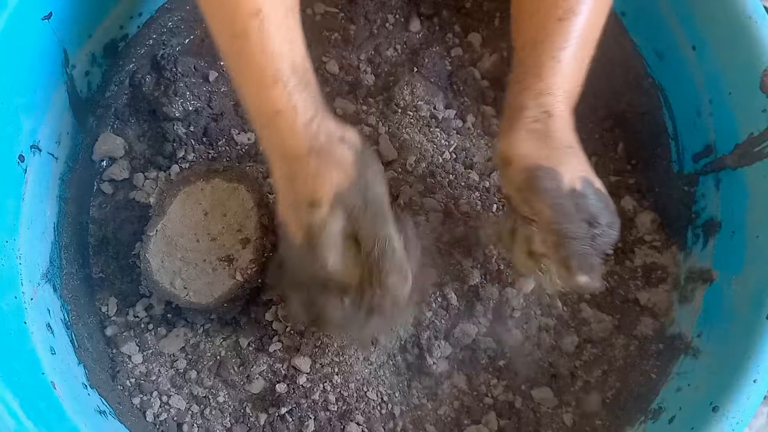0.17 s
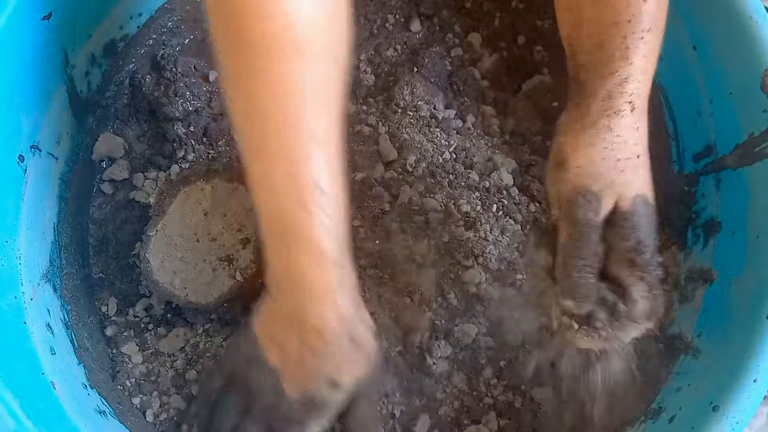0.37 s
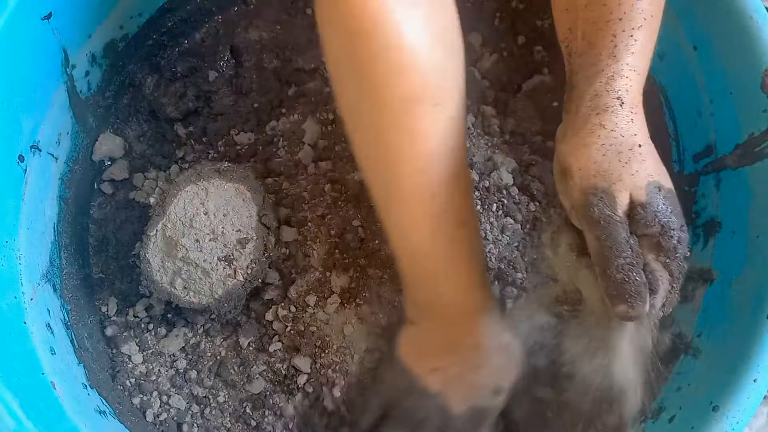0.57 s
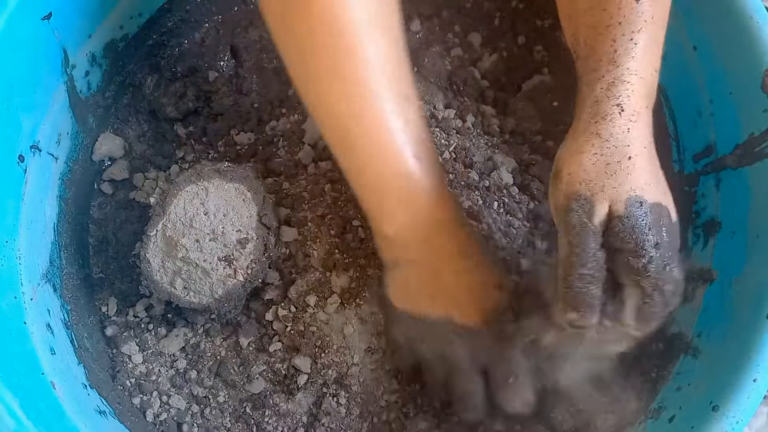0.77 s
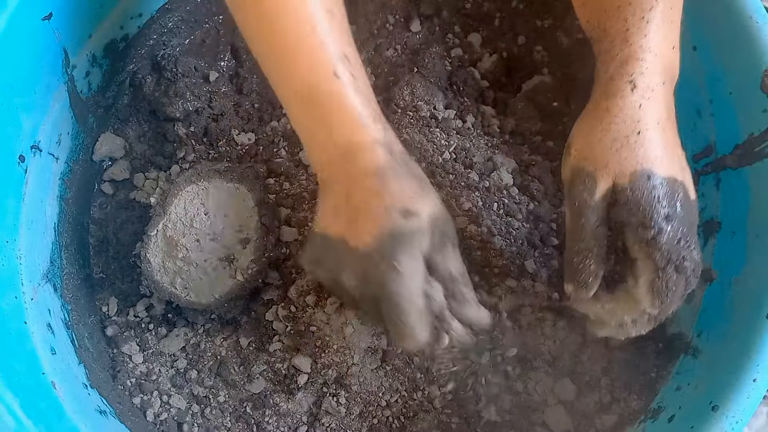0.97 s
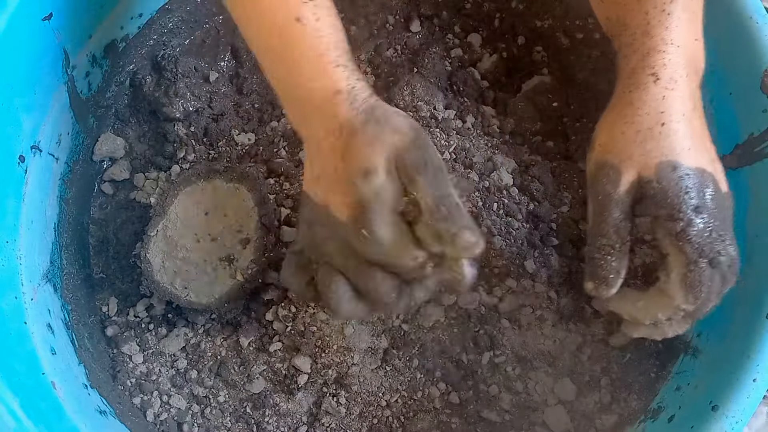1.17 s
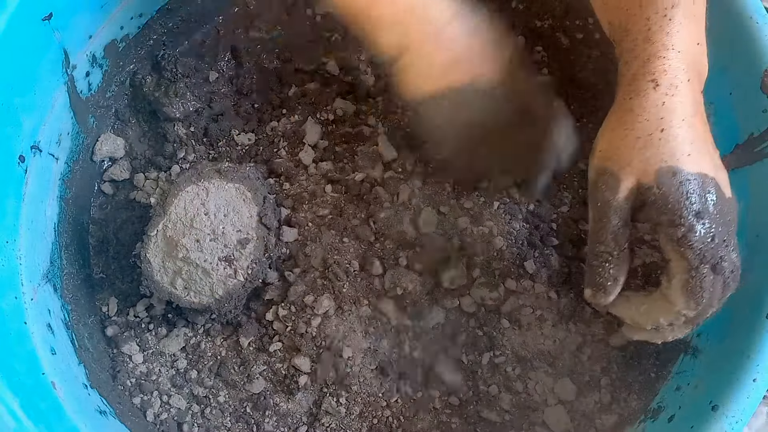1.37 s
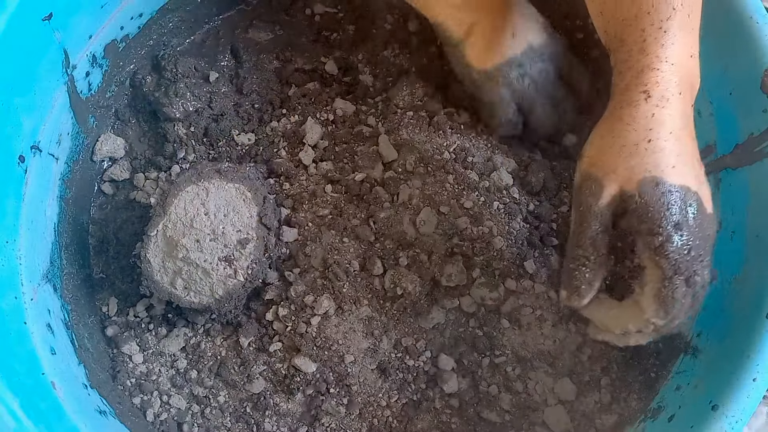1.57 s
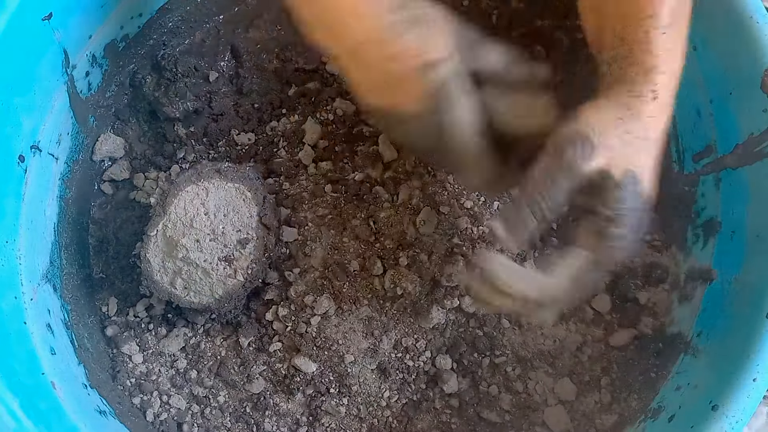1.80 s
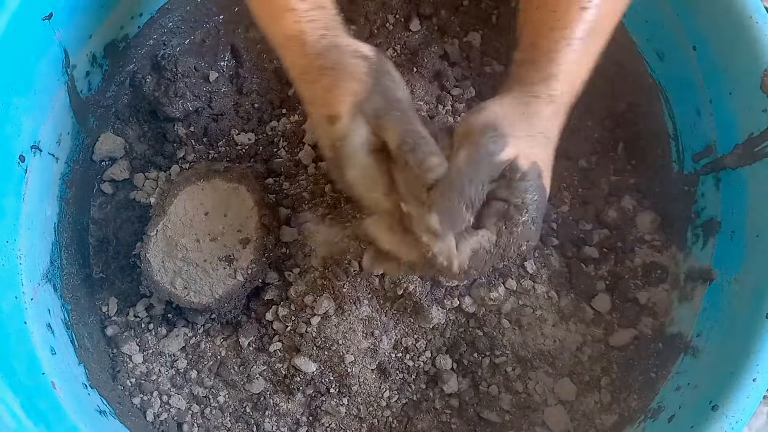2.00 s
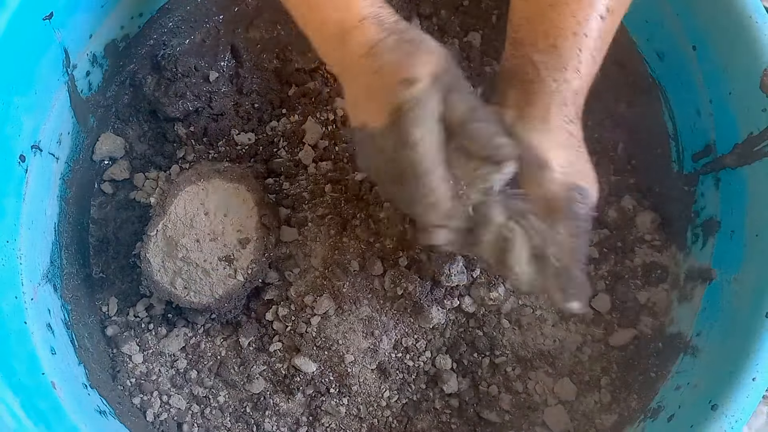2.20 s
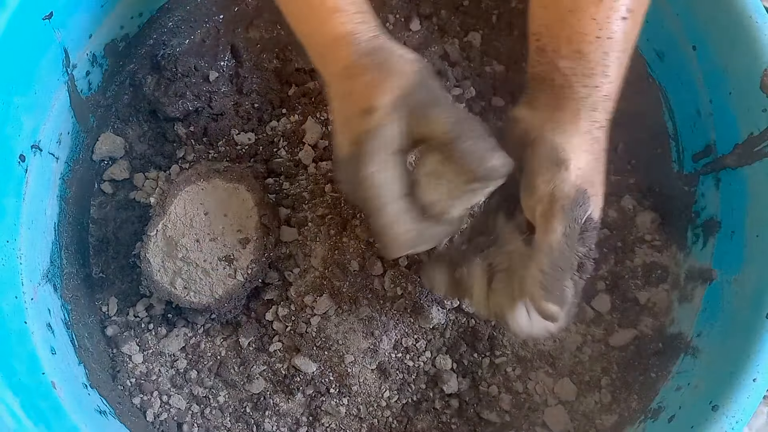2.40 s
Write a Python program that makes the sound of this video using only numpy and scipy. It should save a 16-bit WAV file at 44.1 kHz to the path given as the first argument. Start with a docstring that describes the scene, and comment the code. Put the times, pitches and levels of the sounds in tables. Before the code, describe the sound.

Gritty lumps of damp charcoal are dug, crushed and rubbed by hand in a plastic tub, very close

```python
"""In a plastic basin in a room, close to the microphone, two hands crumble damp, gritty charcoal.
Grit trickles and is rubbed as dense random clicks; a digging hand scrapes by stick-slip, shaking basin and heap.
Knocks are damped thuds with basin modes, snaps single band-passed cracks, crunches dying runs of cracks.
A hard bit pings in decaying sines, and a fresh handful bursts near the end.
Filtered noise gives a low rush and room air behind, with a faint hum."""
import sys
import numpy as np
from scipy import signal
from scipy.fft import rfft, irfft, next_fast_len
from scipy.io import wavfile

SR = 44100
rng = np.random.default_rng(int(sys.argv[2]) if len(sys.argv) > 2 else 0)


def transcribe(u):
    """Save the signal u as a 16-bit wav file named by the first command-line argument.

    u: samples, shape (n,) or (channels, n), limited to [-1, 1]; the rate is SR.
    q: integer samples, one column per channel.
    """
    v = np.clip(np.atleast_2d(u).T, -1, 1)
    q = np.round(v * 32767).astype(np.int16)
    wavfile.write(sys.argv[1], SR, q)


N = 108045
T = np.arange(N) / SR   # time in seconds
CRACKS_PER_S, SLIP_SPREAD_DB = 7600, 2.5


def from_db(db):
    """Amplitude gain is ten to the power of the level in decibels over 20."""
    return 10 ** (np.asarray(db) / 20)


def rms_one(x):
    """Normalise to unit mean-square power."""
    return x / np.sqrt(np.mean(x ** 2) + 1e-20)


def peak_one(x):
    """Normalise to unit peak amplitude."""
    return x / (np.abs(x).max() + 1e-20)


def level(rows):
    """Amplitude envelope: gain over time, linear in decibels between (seconds, dB) points."""
    return from_db(np.interp(T, *np.transpose(rows)))


def add(out, s, sound):
    """Superposition: sum a sound into the output from time s in seconds."""
    i = max(int(s * SR), 0)
    out[i:i + len(sound)] += sound[:max(N - i, 0)]


def colour(x, points):
    """Minimum-phase filtering through (Hz, dB) points by a folded cepstrum; unit power."""
    point_hz, point_db = np.transpose(points)
    size = 2 * next_fast_len(N)
    bin_hz = np.fft.rfftfreq(size, 1 / SR)
    gain = from_db(np.interp(np.log(bin_hz + 1), np.log(point_hz), point_db))
    cepstrum = irfft(np.log(gain))[:size // 2]
    cepstrum[1:] *= 2   # folding makes the response causal
    response = np.exp(rfft(cepstrum, size))
    return rms_one(irfft(rfft(x, size) * response)[:N])


def ring(x, hz, t60):
    """Damped resonator: a unit click starts a sine of height 1 that falls 60 dB in t60 seconds."""
    r, w = from_db(-60 / (t60 * SR)), 2 * np.pi * hz / SR
    # the tiny offset keeps the filter state from dying to denormal numbers
    return signal.lfilter([0, np.sin(w)], [1, -2 * r * np.cos(w), r * r], x + 1e-18)


def band(x, hz, width):
    """Broad resonance: its width is a share of its centre, limited to a third of the sample rate."""
    share = min(width, SR / 3 / hz)
    return signal.lfilter(*signal.iirpeak(hz, 1 / share, fs=SR), x)


def grains(per_s, spread_db, size=N):
    """Random impulse train: sparse clicks of either sign, many small and a few large; unit power."""
    sizes = from_db(spread_db * np.minimum(rng.exponential(1, size), 5))
    signs = rng.choice([-1, 1], size)
    return rms_one(sizes * signs * (rng.random(size) < per_s / SR))


def background():
    """Filtered noise and a steady tone: a low rush that comes and goes, room air and a faint hum."""
    # Low rush. Each row: time in seconds, level in dB.
    rush_level = [(0, -34.5), (.3, -39.5), (.8, -43), (1.0, -45.5), (1.17, -42.5), (1.3, -44), (1.45, -68),
                  (1.49, -37), (1.6, -31.5), (1.68, -42), (2.2, -39.5), (2.3, -44), (2.35, -57),
                  (2.45, -64)]
    # Spectrum of the rush. Each row: frequency in Hz, relative level in dB.
    rush_colour = [(60, -22), (170, -8.5), (240, -16.5), (370, 2.5), (480, 1.5), (600, 1.5), (750, -16),
                   (1100, -39), (4000, -62)]
    # Spectrum of the room air. Each row: frequency in Hz, relative level in dB.
    air_colour = [(20, -57), (45, -26), (80, 3), (140, -6), (250, -9), (500, -11), (1000, -27.5),
                  (3000, -26.5), (8000, -27), (16000, -31)]
    air_db, hum_hz, hum_db = -44.5, 103.3, -54.5
    rush = level(rush_level) * colour(rng.standard_normal(N), rush_colour)
    air = from_db(air_db) * colour(rng.standard_normal(N), air_colour)
    hum = from_db(hum_db) * rms_one(np.sin(2 * np.pi * hum_hz * T))
    return rush + air + hum


def room(x):
    """Diffuse reverberation: convolution with exponentially decaying noise of unit energy."""
    room_db, room_t60_s = -19, 0.21
    t = T[:SR // 2]
    tail = rng.standard_normal(len(t)) * from_db(-60 * t / room_t60_s)
    return from_db(room_db) * signal.fftconvolve(x, tail / np.linalg.norm(tail))[:N]


def grit():
    """Granular noise: fine grains rub and fall, and larger crumbs excite six tick resonances."""
    # Grit rubbed and spilled by the fingers. Each row: time in seconds, level of the fine grains in dB.
    grit_flow = [(0, -30), (.03, -31), (.115, -31.5), (.15, -39.5), (.19, -34.5), (.235, -46.5), (.29, -46),
                 (.36, -41), (.72, -35), (.77, -42), (.83, -34), (.89, -31.5), (.97, -38), (1.04, -40.5),
                 (1.085, -37.5), (1.15, -34), (1.195, -50), (1.24, -57), (1.26, -39.5), (1.33, -61.5),
                 (1.455, -65), (1.475, -41.5), (1.5, -40.5), (1.58, -32.5), (1.65, -45.5), (1.72, -52.5),
                 (1.86, -59.5), (2.0, -72), (2.16, -62), (2.22, -47), (2.25, -45), (2.32, -53),
                 (2.365, -44), (2.41, -59), (2.45, -55)]
    # Spectrum of the fine grains. Each row: frequency in Hz, relative level in dB.
    grit_colour = [(60, 4), (200, -9), (500, 4.5), (750, -1), (1200, -3), (2200, -0.5), (3300, -2.5),
                   (5000, -4), (8000, -15), (12000, -14), (15500, -10)]
    crumbs_per_s, crumb_db = 290, -10   # all pitches together; level relative to the fine grains
    fine = colour(grains(per_s=9000, spread_db=4), grit_colour)
    pitches = np.geomspace(1600, 9000, 6)   # Hz
    crumbs = np.zeros(N)
    for hz in pitches:
        clicks = grains(crumbs_per_s / len(pitches), spread_db=0.5)
        crumbs += band(clicks, hz, width=0.41) / np.sqrt(hz)   # offsets the wider band at high pitch
    return level(grit_flow) * (fine + from_db(crumb_db) * rms_one(crumbs))


def rub():
    """Dense granular friction: damp powder squeezed between the palms gives a thin, bright hiss."""
    # The palms close on a handful and rub it. Each row: time in seconds, level in dB.
    rub_level = [(1.84, -68), (1.92, -52), (2.01, -51.5), (2.07, -43), (2.12, -42.5), (2.165, -41),
                 (2.21, -34.5), (2.25, -60), (2.32, -68)]
    # Spectrum of the rubbing. Each row: frequency in Hz, relative level in dB.
    rub_colour = [(1000, -30), (1600, -4.5), (2200, 0.5), (3000, 0.5), (4600, -0.5), (7500, -9.5),
                  (11000, -8.5), (15500, -7.5)]
    return level(rub_level) * colour(grains(per_s=26000, spread_db=5.0), rub_colour)


def ping():
    """Free vibration: a hard bit flicks free at the end of the dig and rings in decaying modes."""
    # Modes of the hard bit. Each row: frequency in Hz, peak level in dB, 60 dB decay time in seconds.
    ping_modes = [(3735, -25, .14), (4317, -37, .09), (10160, -13.5, .075), (10330, -2, .008),
                  (10600, -23, .06), (10640, -41, .4)]
    ping_s = .706
    out, click = np.zeros(N), signal.unit_impulse(SR // 2)
    add(out, ping_s, sum(from_db(db) * ring(click, hz, t60) for hz, db, t60 in ping_modes))
    return out


def crunches():
    """Progressive fracture: a dying run of tiny cracks in the lump's colour, with a puff of dust."""
    # Lumps giving way. Each row: start in seconds, level in dB, 60 dB decay time in seconds,
    # brightness (band centre) in Hz.
    crunch_rows = [(.002, -23.5, 0.044, 2980), (.058, -23, 0.02, 4630), (0.098, -26, 0.044, 2500),
                   (.111, -24, .02, 2000), (.132, -24.5, 0.018, 4000), (0.323, -41, .025, 6000),
                   (0.6996, -16.5, 0.031, 4040), (.730, -30.5, 0.043, 3500), (.844, -23.5, 0.058, 2940),
                   (.889, -26, 0.027, 4030), (0.9056, -16, .035, 2950), (.944, -22.5, 0.016, 2310),
                   (1.082, -26.5, 0.012, 2400), (1.1065, -29, .018, 2720), (1.2935, -33, .03, 2430),
                   (2.17, -22, 0.077, 2830), (2.179, -21.5, 0.12, 2070), (2.273, -37.5, .05, 3900)]
    attack_s, width = 0.0022, 0.84   # width as a share of the band centre
    dust_db = -7   # relative to the lump
    out, t = np.zeros(N), T[:SR // 5]
    for s, db, t60, hz in crunch_rows:
        cracks = grains(CRACKS_PER_S, spread_db=1.5, size=len(t))
        lump = rms_one(band(band(cracks, hz, width), hz, 2 * width))
        dust = from_db(dust_db) * rms_one(np.diff(cracks, prepend=0))   # differencing brightens
        decay = from_db(-60 * np.maximum(t - attack_s, 0) / t60)
        envelope = np.minimum(t / attack_s, 1) * decay
        add(out, s, from_db(db) * envelope * (lump + dust))
    return out


def snaps():
    """Brittle fracture: an impulse and a brief decaying train of splinters drive a broad resonance."""
    # Brittle snaps. Each row: start in seconds, peak level in dB, brightness (band centre) in Hz.
    snap_rows = [(0.053, -25, 6000), (0.1624, -6.5, 6840), (.346, -13, 6760), (.362, -18, 5000),
                 (0.4424, -8.5, 3860), (0.9055, -22, 3500), (.9092, -11.5, 3270), (0.931, -15, 3980),
                 (0.943, -2.5, 2670), (.9467, -7.5, 2470), (1.0872, -19.5, 6200), (1.108, -16, 2520),
                 (1.170, -16.5, 9000), (1.222, -23, 11000), (1.3235, -28, 6000), (1.333, -28.5, 5000),
                 (1.363, -31, 9000), (1.3995, -28, 9030), (1.406, -34, 3000), (2.262, -32, 5000),
                 (2.2725, -22, 6040), (2.2855, -21, 5940), (2.3095, -26, 4500), (2.3345, -7, 3700),
                 (2.4396, -12, 7300), (2.448, -14, 6000)]
    width = 0.99   # share of the band centre
    splinter_db, splinter_t60_s = -28.52, 0.038   # starting power relative to a unit crack
    out, t = np.zeros(N), T[:SR // 20]
    for s, db, hz in snap_rows:
        splinters = grains(CRACKS_PER_S, SLIP_SPREAD_DB, size=len(t))
        force = from_db(splinter_db - 60 * t / splinter_t60_s) * splinters
        force[0] = 1   # the crack itself
        snap = band(band(force, hz, width), hz, 2 * width)
        add(out, s, from_db(db) * peak_one(snap))
    return out


def basin(force):
    """Modal synthesis: a force excites the basin's modes, damped by the heap, in alternating sign."""
    # The loaded basin. Each row: frequency in Hz, relative level in dB, 60 dB decay time in seconds.
    basin_modes = [(158, -20, 0.04), (244.3, -16.5, 0.088), (349, -18, 0.045), (475, -13.5, 0.053),
                   (533, -13, 0.048), (810, -5.5, 0.026), (903, -2.5, 0.025), (952, -4.5, 0.028),
                   (1095, -7, 0.019), (1364, -9, 0.021), (1530, -7, 0.011)]
    out = np.zeros(len(force))
    for k, (hz, db, t60) in enumerate(basin_modes):
        out += (-1) ** k * from_db(db) * ring(force, hz, t60)
    return out


def knocks():
    """Impact: each knock swells quickly into a damped thud and sets the basin's modes ringing."""
    # Dull knocks of lumps and knuckles. Each row: start in seconds, peak level of the thud in dB,
    # pitch in Hz, 60 dB decay time in seconds, basin ring relative to the thud in dB.
    knock_rows = [(.162, -26, 950, 0.023, 1), (0.2009, -16, 774, .018, -13),
                  (0.2017, -12, 236, 0.029, -12.5), (.306, -20, 430, 0.011, -12),
                  (0.3143, -16.5, 164, 0.044, -27), (.376, -9, 880, 0.032, -16.5),
                  (.3805, -3, 900, 0.012, -12), (.393, 0.5, 887, 0.018, -10), (.405, -21, 85, .1, -25),
                  (.4112, -0.5, 846, 0.011, -8), (.4422, 0, 990, 0.0075, -2), (.4815, -8.5, 890, 0.019, 1),
                  (.496, -4, 746, 0.0069, -3), (0.533, -15, 94, 0.073, -20), (.649, -12, 393, 0.021, -21),
                  (0.6652, 2.5, 945, 0.0094, -6), (.695, -12, 184, 0.031, -20),
                  (0.7291, -18, 1483, 0.024, -6), (0.734, -21, 540, 0.034, 5), (0.76, -19.5, 486, 0.022, 1),
                  (.765, -20, 217, 0.038, -1.5), (.845, -20.5, 534, 0.12, -7),
                  (.9435, -14.5, 1433, 0.024, -1.5), (0.9459, -23.5, 214, 0.036, -5),
                  (1.182, -24, 546, .03, -12), (1.1985, -17, 533, 0.02, -10),
                  (1.219, -23, 90, 0.071, -17.5), (1.333, -36, 525, 0.0083, -4.5),
                  (1.386, -43, 910, 0.027, -8), (2.1694, -15.5, 305, 0.01, -28),
                  (2.183, -16.5, 426, 0.01, -17), (2.19, -26, 125, .09, -19),
                  (2.269, -31.5, 1220, 0.013, 2.5), (2.335, -21.5, 1570, 0.0099, -0.5)]
    contact_s = 0.00075   # time constant of the swell
    out, click = np.zeros(N), signal.unit_impulse(SR // 5)
    swell = 1 - np.exp(-T[:len(click)] / contact_s)
    shell = peak_one(basin(click) * swell)
    for s, db, hz, t60, shell_db in knock_rows:
        thud = peak_one(ring(click, hz, t60) * swell)
        add(out, s, from_db(db) * (thud + from_db(shell_db) * shell))
    return out


def dig():
    """Stick-slip friction: slipping lumps shake the basin and the heap, while grit scratches under them."""
    # Basin shaken under the pressure of the digging hand. Each row: time in seconds, level in dB.
    dig_level = [(.3, -80), (.335, -48), (.352, -27), (.373, -28), (.379, -13), (.398, -13), (.41, -17),
                 (.428, -24.5), (.445, -12), (.455, -17), (.485, -13), (.505, -16), (.53, -22),
                 (.565, -16.5), (.61, -15), (.655, -14), (.69, -19.5), (.704, -23), (.716, -61), (.79, -45),
                 (.83, -45), (.87, -90)]
    # Rumble of the heap as the hand sinks in and shoves it. Each row: time in seconds, level in dB.
    heap_level = [(.35, -70), (.385, -31), (.42, -25), (.445, -24), (.48, -20), (.51, -24), (.545, -17),
                  (.58, -21.5), (.62, -22), (.655, -18.5), (.695, -22.5), (.715, -42), (.79, -36),
                  (.83, -72)]
    # Spectrum of the heap. Each row: frequency in Hz, relative level in dB.
    heap_colour = [(25, -24), (50, -9), (90, 1), (170, 1), (250, 0.5), (350, -5), (480, 1.5), (700, -11.5),
                   (1100, -29), (2000, -56.5)]
    # Scratch of the grit under that hand. Each row: time in seconds, level in dB.
    scratch_level = [(.355, -94), (.378, -25.5), (.398, -22.5), (.425, -33.5), (.445, -23), (.46, -28),
                     (.485, -17.5), (.53, -24), (.6, -24), (.65, -22.5), (.69, -23.5), (.705, -23),
                     (.72, -59), (.8, -80)]
    # Spectrum of the scratch. Each row: frequency in Hz, relative level in dB.
    scratch_colour = [(300, -23), (1200, 7), (2200, 5.5), (3200, 0.5), (5500, 1), (8000, -6), (11000, -4.5),
                      (15500, -4)]
    slips = grains(per_s=2200, spread_db=SLIP_SPREAD_DB)
    shell = level(dig_level) * rms_one(basin(slips))
    heap = level(heap_level) * colour(slips, heap_colour)
    scratch = level(scratch_level) * colour(grains(per_s=14000, spread_db=2.5), scratch_colour)
    return shell + heap + scratch


def scene():
    """Linear superposition: all that the hands do, its reverberation and the background."""
    hands = grit() + rub() + dig() + knocks() + snaps() + crunches() + ping()
    return (hands + room(hands) + background())[None]


def record(dry):
    """Band limiting and overload: the lowest bass falls away, peaks clip and the top is cut."""
    low_cut_hz, overload, cutoff_hz = 76, 1.0, 15750   # overload as an amplitude
    thin = signal.sosfilt(signal.butter(2, low_cut_hz, "high", fs=SR, output="sos"), dry)
    clipped = np.clip(thin, -overload, overload)
    return signal.sosfilt(signal.ellip(10, .1, 80, cutoff_hz, fs=SR, output="sos"), clipped)


dry = scene()
out = record(dry)
transcribe(out)
```